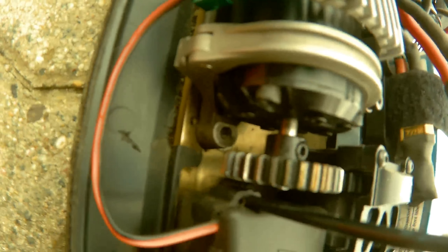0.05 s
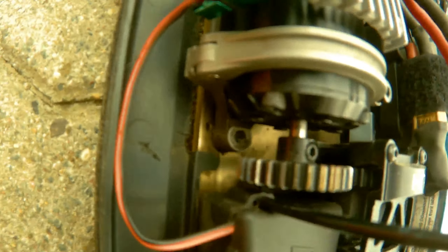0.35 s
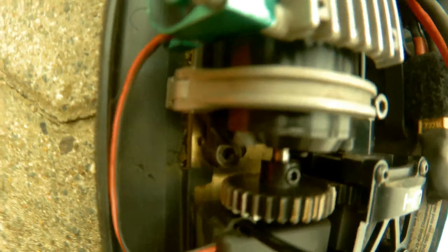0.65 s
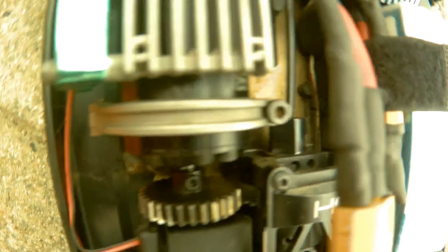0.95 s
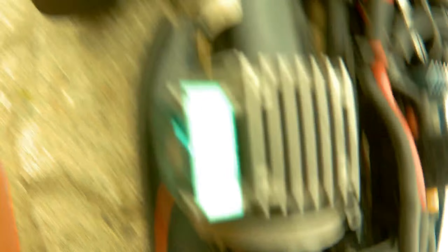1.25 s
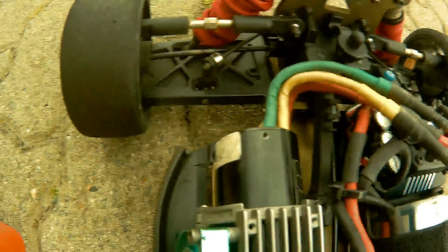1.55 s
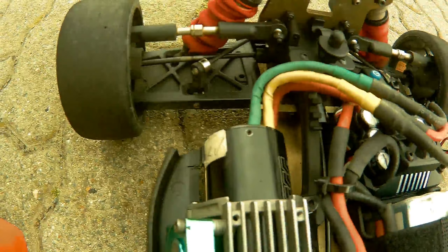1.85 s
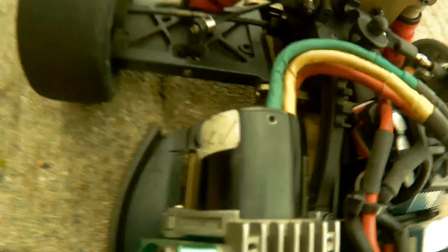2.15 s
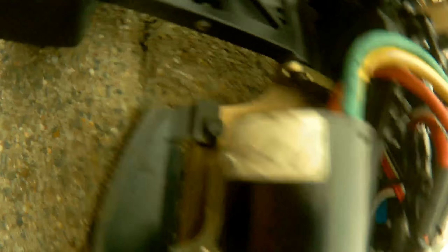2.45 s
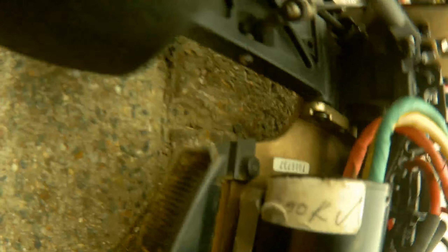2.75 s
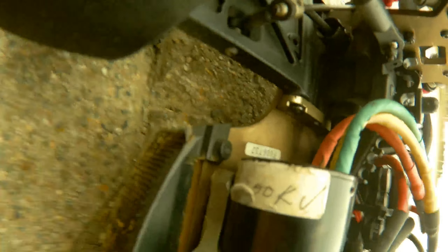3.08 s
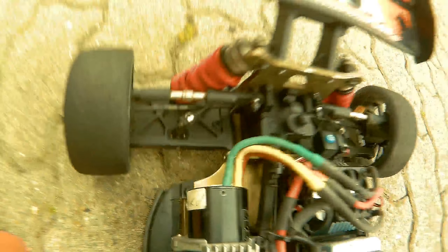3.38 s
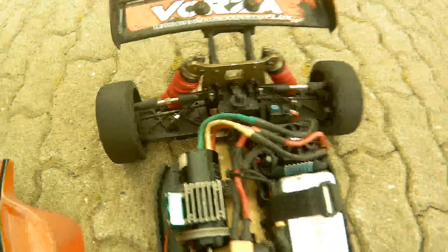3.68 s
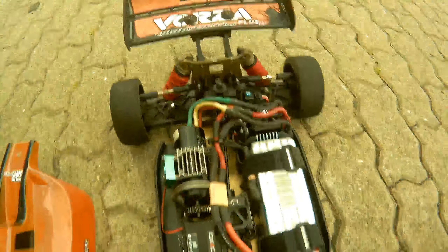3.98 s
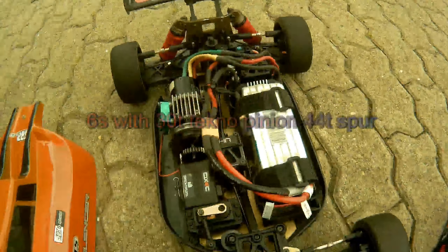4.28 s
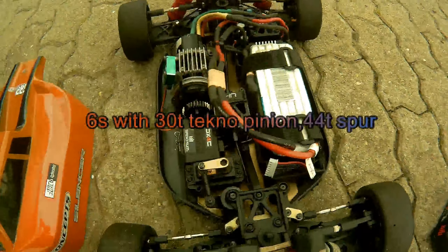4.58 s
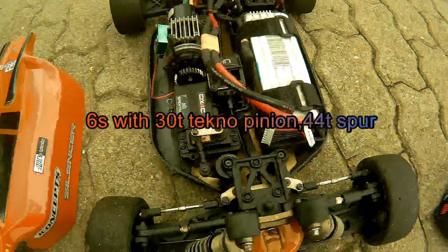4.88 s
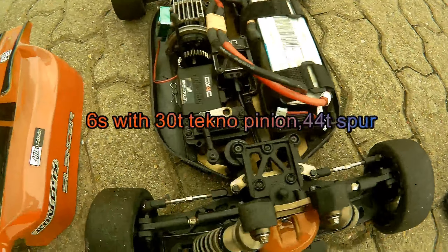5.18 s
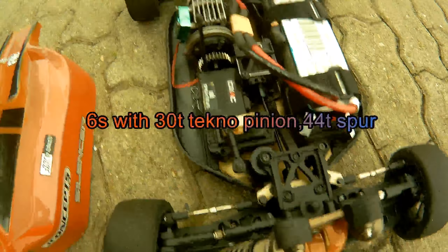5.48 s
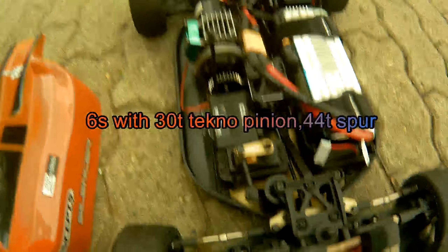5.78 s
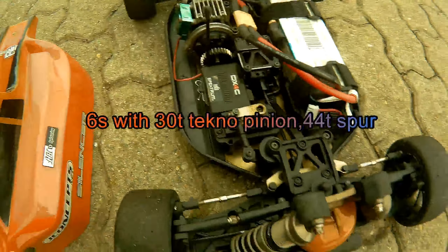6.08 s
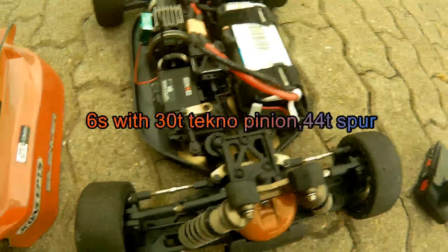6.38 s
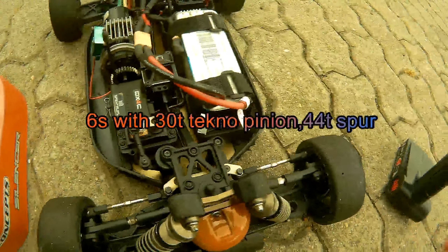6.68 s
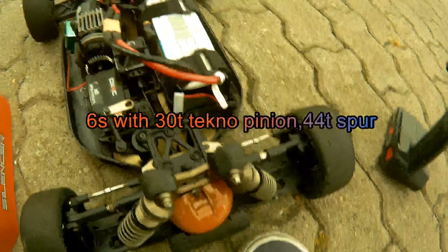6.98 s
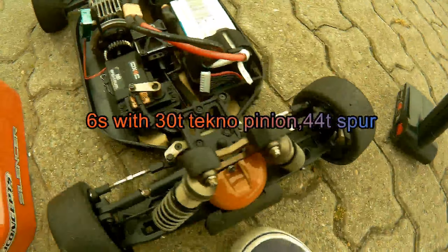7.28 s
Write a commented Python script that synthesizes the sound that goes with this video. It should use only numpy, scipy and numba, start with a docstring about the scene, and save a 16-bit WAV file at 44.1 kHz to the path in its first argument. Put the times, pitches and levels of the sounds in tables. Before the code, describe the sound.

A radio-controlled car stands powered up outdoors, its small cooling fans making a bright, ringing hiss over a steady buzzing whine of several held tones. The microphone is very close at first, and the hiss swells. About halfway through it backs away, so the hiss drops and the whine carries on more softly. A few small handling creaks come early, a light breeze rumbles now and then, and a shoe scuffs faintly at the end.

```python
"""Two small fans sing and hiss over a steady buzzing whine: a radio-controlled car stands powered up on
paving. The fan blades chop the air into tones, their draught rings the gaps between heat-sink fins, and
current pulses in the electronics make the whine. A hand-held camera moves close over the car and then
backs away, so the sound weakens and changes colour. A breeze rumbles on the microphone, the camera body
creaks in the hand, and a shoe scuffs at the end."""
import sys
import numpy as np
from scipy import signal
from scipy.fft import rfft, irfft
from scipy.io import wavfile
from scipy.ndimage import uniform_filter1d, map_coordinates
from numba import njit

SR = 44100
rng = np.random.default_rng(int(sys.argv[2]) if len(sys.argv) > 2 else 0)


def generate_wav(sig):
    """Save sig (samples, or channels by samples) to the path in sys.argv[1] as 16-bit PCM at SR."""
    pcm = np.round(np.clip(np.atleast_2d(sig).T, -1, 1) * 32767).astype(np.int16)
    wavfile.write(sys.argv[1], SR, pcm)


N = 323253
CLOSE_M, CROUCH_M, STANDING_M = .1, .18, .51  # microphone distances from the fans

# Path of the microphone. Each row: time in seconds, distance from the fans in metres.
MIC_DISTANCE = [(0, .12), (.75, .095), (1.2, .11), (1.55, 0.18), (1.95, 0.18), (2.45, .08), (3.1, 0.12),
                (3.6, 0.31), (4.25, 0.43), (4.7, 0.62), (5.2, 0.53), (5.8, .46), (7.33, 0.5)]
# Blade-passing tone of the motor fan. Each row: time in seconds, frequency in Hz.
BLADE_PITCH = [(0.0, 1649), (4.49, 1650), (4.74, 1653), (7.0, 1658), (7.33, 1651)]
# Strength of that tone. Each row: time in seconds, relative level in dB.
BLADE_LEVEL = [(0.0, -50.5), (1.12, -46), (1.59, -50.5), (1.71, -46), (2.28, -52.5), (3.27, -46),
               (3.49, -51.5), (3.96, -52.5), (4.2, -63), (5.25, -65), (5.64, -55.5), (6.15, -53),
               (7.29, -69), (7.33, -59)]
# Weak motor fan overtones. Each row: multiple of the shaft rate, dB against the blade tone close by.
MOTOR_OVERTONES = [(2, -21), (3, -22), (4, -16), (6, -19), (10, -13), (11, -25), (12, -22), (14, -15),
                   (16, -12), (18, -17), (20, -17), (21, -25), (25, -26)]
# Shaft-rate hum of the speed controller's fan. Each row: time in seconds, level in dB.
CONTROLLER_HUM = [(0, -50.5), (1.1, -49.5), (1.5, -57.5), (2.1, -54.5), (3.1, -59.5), (4.3, -64),
                  (7.33, -65.5)]
# Harmonic series. Each row: harmonic number, relative dB close by, at half height, at standing height.
CONTROLLER_OVERTONES = [(3, -61, -66, -68), (5, -70, -72, -76), (6, -56.5, -53, -55.5), (7, -63, -59, -62),
                        (8, -66, -62, -62), (9, -67, -66, -69), (10, -72, -72, -75), (11, -66, -69, -71),
                        (12, -72, -71, -75), (13, -66, -68, -74), (14, -70, -63, -69), (15, -74, -74, -77),
                        (16, -75, -75, -78), (18, -76, -76, -79)]
WHINE_OVERTONES = [(4, -61, -61, -67), (5, -56, -62, -71), (6, -66, -70, -77), (7, -67, -73, -81),
                   (8, -59, -62, -65), (9, -59, -60, -64), (10, -57, -54, -66), (11, -56, -50, -61),
                   (12, -54, -56, -67), (13, -57, -60, -66), (14, -68, -67, -74), (15, -70, -70, -76),
                   (16, -66, -70, -78), (21, -68, -76, -84), (22, -64, -72, -75), (23, -70, -74, -80),
                   (24, -67, -67, -78), (25, -66, -68, -75)]
# Strongest tones of the whine. Each row: time in seconds, dB of harmonic 2, dB of harmonic 3.
WHINE_MAIN_TONES = [(0, -47.5, -59), (1, -45.5, -55), (2, -48.5, -55), (2.85, -51, -58), (3.4, -49, -56),
                    (3.95, -52.5, -54.5), (4.3, -61, -57.5), (4.6, -50.5, -54.5), (5.1, -61.5, -58.5),
                    (5.65, -54, -51.5), (6.4, -56, -58), (7.33, -60, -58)]
# Resonance of the air between the fins. Each row: time in seconds, frequency in Hz, level in dB.
FIN_RESONANCE = [(0, 4950, -40.5), (.25, 4860, -40.5), (.7, 4960, -38.5), (1.05, 5160, -35.5),
                 (1.32, 5080, -39.5), (1.52, 5070, -35), (1.92, 5050, -39), (2.35, 5140, -34),
                 (2.55, 4900, -34), (2.76, 4870, -36.5), (3.05, 4800, -34), (3.35, 5180, -35.5),
                 (3.67, 5150, -43.5), (4.4, 5180, -54.5), (5.1, 4900, -58), (5.45, 4890, -53.5),
                 (5.8, 4980, -55), (6.2, 5020, -50), (6.38, 4950, -52.5), (6.55, 4930, -48.5),
                 (6.8, 4900, -51), (7.33, 4970, -51)]
# Damping of that resonance. Each row: time in seconds, bandwidth of each filter stage in Hz.
FIN_BANDWIDTH = [(0, 1500), (1, 596), (1.5, 780), (2.3, 900), (2.6, 680), (3.05, 620), (3.4, 895),
                 (4.2, 940), (4.8, 350), (5.5, 290), (6.5, 380), (7.33, 520)]
# Draught behind the motor fan. Each row: time in seconds, level in dB, higher fin resonance in Hz.
DRAUGHT_FLOW = [(0, -64, 6700), (.65, -62, 6600), (1.3, -57.5, 5600), (2.05, -57, 5300),
                (2.55, -43.5, 5900), (3.2, -45.5, 5790), (3.55, -62, 5400), (4.4, -81, 5500),
                (7.33, -73, 5400)]
# Band cancelled by a chassis reflection. Each row: time in seconds, centre in Hz, depth from 0 to 1.
CANCELLED_BAND = [(0, 3750, 0), (1, 4230, .9), (1.45, 4160, 0), (2.2, 3900, .05), (2.5, 4005, .85),
                  (3.3, 4000, .85), (3.8, 3900, 0.3), (7.33, 4450, 0.1)]
# Gusts on the microphone. Each row: time of the peak in seconds, level in dB, half-length in seconds.
WIND_GUSTS = [(.01, -45, 0.13), (.49, -46.5, 0.086), (2.982, -48, .025), (3.16, -53, .035),
              (4.19, -53, .04), (4.642, -47, 0.049), (4.834, -46, .025), (5.522, -51, 0.056),
              (6.504, -48.5, 0.11), (6.676, -55, .04), (7.06, -48, 0.11)]
# Slips of the camera body. Each row: start in seconds, peak in dB, ring in Hz, time constant in ms.
BODY_SLIPS = [(.7835, -28, 1800, .5), (.7925, -27, 1900, .5), (.7952, -30, 2900, .35),
              (.7968, -19, 1500, .35), (.7970, -29, 300, .7), (2.2993, -22, 1050, .3),
              (2.3120, -18, 1150, .4), (2.3210, -21, 1100, .35), (2.3305, -27, 1050, .35),
              (2.3436, -22, 1100, .3), (2.6932, -18, 430, .6), (2.7110, -23, 380, .8),
              (2.7290, -26, 600, .6), (2.7340, -27, 400, .8), (5.658, -40, 1200, .5), (6.048, -37, 850, .7),
              (6.090, -39, 900, .7), (6.629, -38, 700, .8)]

# Spectra of the noise sources. Each row: frequency in Hz, relative spectral density in dB.
NEAR_HISS_SPECTRUM = [(3000, -25), (3900, 2), (4500, 4), (6000, -12), (7100, 8), (7550, 4), (8300, 6.5),
                      (9100, -0.5), (9800, 4), (10700, 1), (11450, 4.5), (12300, -3), (13200, -4),
                      (14200, -13)]
FAR_HISS_SPECTRUM = [(3000, -18), (3900, -2), (4350, 3.5), (4700, -5), (5500, 2.5), (6050, 1), (6650, 7.5),
                     (7600, 1.5), (8950, -3), (9900, 1.5), (10900, -3), (12000, -1.5), (13400, -5),
                     (14400, -13.5)]
NEAR_RUSH_SPECTRUM = [(40, -7), (120, -3.5), (230, -1.5), (500, 2), (950, 3), (1300, 5), (1750, 1.5),
                      (2150, -0.5), (2700, -2.5), (3200, -5), (4000, -28), (5000, -31), (16000, -45)]
FAR_RUSH_SPECTRUM = [(40, -13), (120, -0.5), (210, 2), (330, 0), (520, -1), (950, 2.5), (1300, 0.5),
                     (1700, 0), (2050, -4.5), (2700, -2.5), (3200, -12.5), (4000, -19), (5000, -28),
                     (16000, -51)]
DRAUGHT_SPECTRUM = [(100, -10), (180, -10), (228, 8), (280, -8.5), (650, -3.5), (1400, 0.5), (2000, -3.5),
                    (2600, -2), (3350, 6.5), (3800, 1.5), (4030, 0), (4450, 9.5), (6400, 0.5), (7300, -5.5),
                    (8600, 3), (9400, -24), (13000, -6), (16000, -23)]
BREEZE_SPECTRUM = [(10, -2), (25, -0.5), (45, 3.5), (80, -1), (130, -6.5), (250, -20.5), (1000, -55)]
RUB_SPECTRUM = [(60, -8), (170, -1), (380, 1), (750, -3), (1200, -3), (1700, -20), (5000, -40)]
SCRAPE_SPECTRUM = [(200, -16), (700, -1), (1100, 8), (1800, -3), (3500, -23), (6000, -24), (16000, -34)]
GRIT_SPECTRUM = [(2000, -28), (6000, -3), (7100, 4), (8000, -10), (12500, -23), (14000, -13), (16000, -39)]


def undb(db):
    """Amplitude grows tenfold with every 20 dB."""
    return 10 ** (np.asarray(db) / 20)


def curves(table):
    """Linear interpolation in time gives each later column of a table one value a sample."""
    times, *columns = np.transpose(table)
    return [np.interp(np.arange(N) / SR, times, column) for column in columns]


def drift(rate_hz):
    """Random steps, smoothed twice, form a band-limited fluctuation with a spread near 1."""
    hold = max(int(SR / rate_hz), 1)
    steps = np.repeat(rng.standard_normal(N // hold + 1), hold)
    return 1.37 * uniform_filter1d(uniform_filter1d(steps, hold), hold)[:N]


def swell(start_s, end_s, attack_s, release_s):
    """An envelope with Gaussian flanks rises up to the start, holds, and falls after the end."""
    t = np.arange(N) / SR
    before, after = np.minimum(t - start_s, 0), np.maximum(t - end_s, 0)
    return np.exp(-(before / attack_s) ** 2 - (after / release_s) ** 2)


def noise(spectrum, band_hz=(0, SR)):
    """Spectral weighting colours white noise; the part inside the band has rms 1."""
    hz = np.maximum(np.arange(N // 2 + 1) * SR / N, 1)
    points_hz, db = np.transpose(spectrum)
    bins = rfft(rng.standard_normal(N)) * undb(np.interp(np.log(hz), np.log(points_hz), db))
    in_band = (hz > band_hz[0]) * (hz < band_hz[1])
    return irfft(bins, N) / np.std(irfft(bins * in_band, N))


@njit
def bandpass(x, hz, width_hz):
    """A damped second-order resonator, in state-variable form, passes a moving band."""
    y, band_state, low_state = np.empty(len(x)), 0., 0.
    for i in range(len(x)):
        tuning, damping = np.tan(np.pi * hz[i] / SR), width_hz[i] / hz[i]
        band = (band_state + tuning * (x[i] - low_state)) / (1 + tuning * (tuning + damping))
        band_state = 2 * band - band_state
        low_state += 2 * tuning * band
        y[i] = damping * band
    return y


def distance():
    """The path length from fans to microphone, in metres, governs level and colour."""
    return np.maximum(curves(MIC_DISTANCE)[0], CLOSE_M / 2)


def heard_db(close_db, loss_db):
    """Spreading sound loses loss_db with each doubling of the distance from CLOSE_M."""
    return close_db - loss_db * np.log2(distance() / CLOSE_M)


def height():
    """Normalised distance runs from 0 close over the chassis to 1 at standing height."""
    return np.clip((distance() - CROUCH_M) / (STANDING_M - CROUCH_M), 0, 1)


def by_height(near, far):
    """Independent noises add in power, so square-root weights blend them evenly as the microphone rises."""
    up = height()
    return np.sqrt(1 - up) * near + np.sqrt(up) * far


def phase(hz, wobble_hz):
    """Phase is the integral of frequency, which here wobbles a little."""
    return 2 * np.pi * np.cumsum(hz + wobble_hz * drift(25)) / SR


def tone(angle, multiple, db, waver_db):
    """A harmonic of rms level db wavers as the microphone moves through the sound field."""
    offset = 2 * np.pi * rng.random()
    amplitude = np.sqrt(2) * undb(db + waver_db * drift(5.07))
    return amplitude * np.sin(round(multiple) * angle + offset)


def overtones(angle, series, gain_db, waver_db):
    """Harmonics superpose in a balance that depends on the height of the microphone."""
    up = height()
    return sum(tone(angle, multiple, gain_db + np.interp(up, (0, .5, 1), levels), waver_db)
               for multiple, *levels in series)


def motor_fan(blade_count=5):
    """Blades sing at the blade-passing frequency, blade count times shaft rate; imbalance hums below."""
    blade_hz, = curves(BLADE_PITCH)
    blade_db = curves(BLADE_LEVEL)[0] + 2.5
    shaft = phase(blade_hz / blade_count, wobble_hz=.25)
    blades = tone(shaft, blade_count, blade_db, waver_db=2.4)
    hum = tone(shaft, 1, heard_db(-50.5, loss_db=9.5), waver_db=2.5)
    third_harmonic = tone(shaft, 3 * blade_count, heard_db(-45.5, loss_db=6.1), waver_db=3.5)
    weak = sum(tone(shaft, multiple, blade_db + db, waver_db=-.5) for multiple, db in MOTOR_OVERTONES)
    directivity = undb(-5 * height())  # the weak overtones beam sideways and reach less far upwards
    return blades + hum + third_harmonic + weak * directivity


def controller_fan(start_hz=151.1, final_hz=154.85, settle_s=2.1):
    """A slower, quieter fan radiates harmonics of a shaft rate that creeps exponentially to its limit."""
    shaft_hz = final_hz + (start_hz - final_hz) * np.exp(-np.arange(N) / SR / settle_s)
    shaft = phase(shaft_hz, wobble_hz=.08)
    hum_db, = curves(CONTROLLER_HUM)
    hum = tone(shaft, 1, hum_db, waver_db=1.9)
    return hum + overtones(shaft, CONTROLLER_OVERTONES, gain_db=-.6, waver_db=1.5)


def electronics(pulse_hz=540.45):
    """Periodic current pulses give a harmonic series; its third harmonic beats with the blade tone."""
    second_db, third_db = curves(WHINE_MAIN_TONES)
    clock = phase(pulse_hz, wobble_hz=.04)
    strong = tone(clock, 2, second_db, waver_db=-.03) + tone(clock, 3, third_db, waver_db=-.03)
    return strong + overtones(clock, WHINE_OVERTONES, gain_db=-1.96, waver_db=2.5)


def air_resonance(hz, width_hz):
    """Broadband turbulence excites a steep-sided resonance, with rms 1 at any width."""
    width = width_hz * np.ones(N)
    turbulence = rng.standard_normal(N)
    ring = bandpass(bandpass(turbulence, hz, width), hz, width) / np.sqrt(width)
    return ring / np.std(ring)


def chassis_echo(x, share, delay_ms, sway_ms):
    """A reflection off the chassis forms a comb filter, which drifts as the hand sways."""
    lag = (delay_ms + sway_ms * drift(2.5)) * SR / 1000
    echo = map_coordinates(x, [np.arange(N) - lag], order=3, mode="nearest")
    return (x + share * echo) / np.sqrt(1 + share ** 2)


def fin_hiss():
    """Turbulent fan air hisses over the heat sink and drives the gaps between its fins into resonance."""
    ring_hz, ring_db = curves(FIN_RESONANCE)
    width_hz, = curves(FIN_BANDWIDTH)
    band_hz = (7200, 13000)
    hiss = by_height(noise(NEAR_HISS_SPECTRUM, band_hz), noise(FAR_HISS_SPECTRUM, band_hz))
    hiss = chassis_echo(hiss, share=.2, delay_ms=.5, sway_ms=.04)
    ring = air_resonance(ring_hz, width_hz) * undb(ring_db + .77 * drift(30))
    return ring + hiss * undb(heard_db(-45.5, loss_db=4.68) + .6 * drift(12))


def airflow():
    """Flow noise spreads as a low rush; the draught behind the motor fan excites a higher fin resonance."""
    draught_db, ring_hz = curves(DRAUGHT_FLOW)
    band_hz = (480, 880)
    rush = by_height(noise(NEAR_RUSH_SPECTRUM, band_hz), noise(FAR_RUSH_SPECTRUM, band_hz))
    draught = noise(DRAUGHT_SPECTRUM, band_hz=(2850, 3900))
    ring_db = -7 + .69 * draught_db  # the ring grows more slowly than the draught that drives it
    ring = air_resonance(ring_hz, width_hz=930) * undb(ring_db + .56 * drift(20))
    rush *= undb(heard_db(-52, loss_db=2.49) + .2 * drift(9.9))
    draught *= undb(draught_db + .8 * drift(7.5))
    return rush + draught + ring


def chassis_notch(x, width_hz=350):
    """Destructive interference near the chassis cancels a band that moves with the microphone."""
    hz, depth = curves(CANCELLED_BAND)
    return x - np.clip(depth, 0, 1) * bandpass(x, hz, np.full(N, width_hz, dtype=float))


def breeze():
    """Pressure fluctuations rumble on the microphone; gusts and gently stirring air add in power."""
    gusts = sum(undb(db) * swell(peak_s, peak_s, half_s, half_s) for peak_s, db, half_s in WIND_GUSTS)
    calm = undb(-61.5 + 2.5 * drift(5.3))
    return noise(BREEZE_SPECTRUM) * np.hypot(calm, gusts * undb(.99 * drift(14)))


def camera_creaks():
    """Each slip of the plastic body excites a heavily damped vibration of very few cycles."""
    out, t = np.zeros(N + SR), np.arange(SR // 20) / SR
    for start_s, peak_db, ring_hz, time_constant_ms in BODY_SLIPS:
        age = 1000 * t / time_constant_ms
        burst = age ** 2 * np.exp(-age) * np.sin(2 * np.pi * ring_hz * t)
        start = int(start_s * SR)
        out[start:start + len(t)] += undb(peak_db) * burst / np.abs(burst).max()
    return out[:N]


def finger_rub():
    """Stick-slip friction of a finger on the camera body makes a brief, rough noise."""
    press = swell(start_s=2.694, end_s=2.738, attack_s=.0044, release_s=.015)
    return noise(RUB_SPECTRUM) * press * undb(-35 + 1.5 * drift(400))


def shoe_scuff(scrape_s=7.3, grit_s=7.325):
    """Sliding friction makes a sole scrape unevenly over the paving and grind grit as it stops."""
    scrape = noise(SCRAPE_SPECTRUM) * undb(-47) * swell(scrape_s, scrape_s, attack_s=.1, release_s=.15)
    grit = noise(GRIT_SPECTRUM) * undb(-42) * swell(grit_s, grit_s, attack_s=.022, release_s=.15)
    return (scrape + grit) * undb(1.5 * drift(120))


def scene():
    """Sound pressures superpose at one microphone, which feeds both channels alike."""
    car = motor_fan() + controller_fan() + electronics() + chassis_notch(fin_hiss() + airflow())
    mono = car + camera_creaks() + finger_rub() + breeze() + shoe_scuff()
    return np.array([mono, mono])


def record(dry, cutoff_hz=15650):
    """A steep low-pass filter limits the bandwidth of the camera."""
    return signal.sosfilt(signal.ellip(10, .1, 80, cutoff_hz, fs=SR, output="sos"), dry)


dry = scene()
out = record(dry)
generate_wav(out)
```